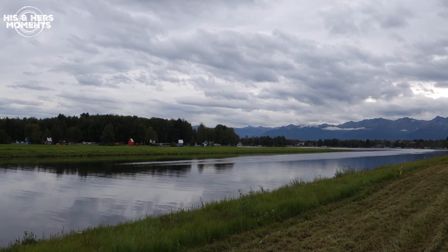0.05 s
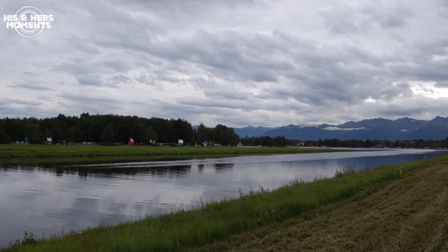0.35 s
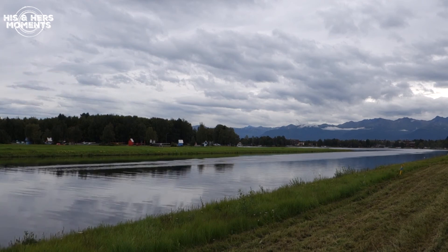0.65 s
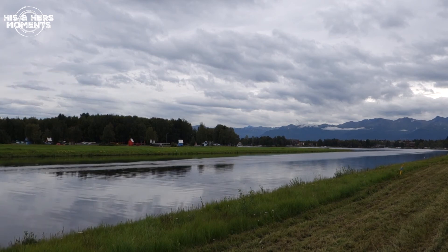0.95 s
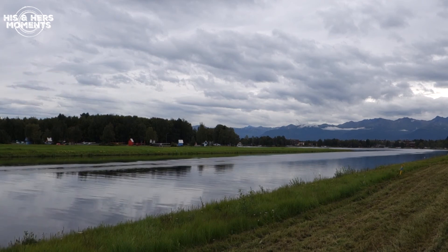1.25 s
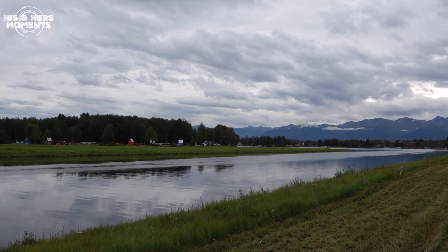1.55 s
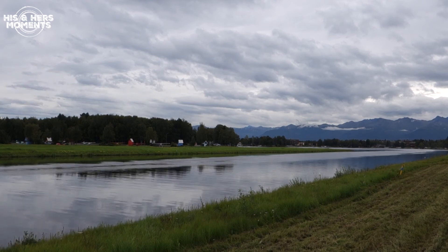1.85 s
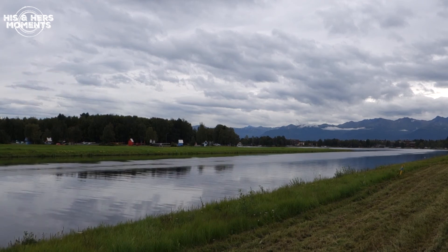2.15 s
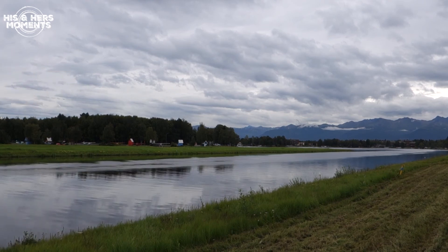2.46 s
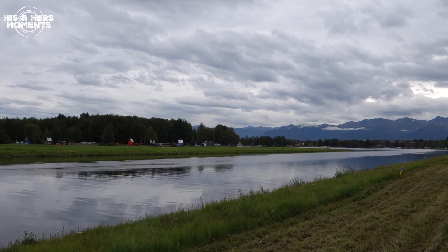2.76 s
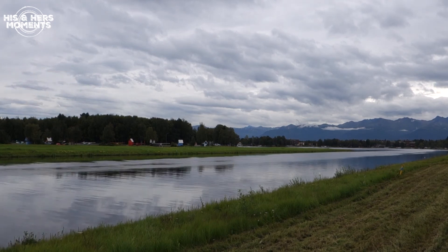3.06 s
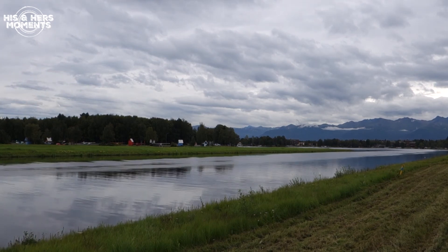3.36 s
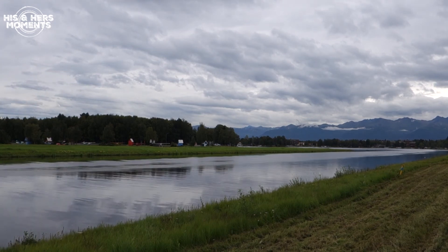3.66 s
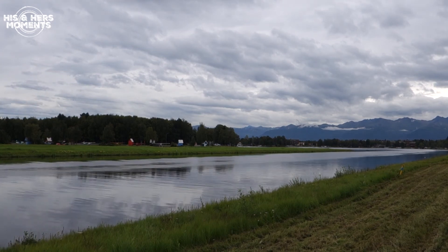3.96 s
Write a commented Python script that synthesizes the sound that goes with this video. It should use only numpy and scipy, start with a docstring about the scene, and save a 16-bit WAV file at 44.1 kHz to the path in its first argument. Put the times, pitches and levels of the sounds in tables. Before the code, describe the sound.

A small propeller aircraft passes, its buzz sinking into a duller, throbbing drone.

```python
"""Over soft ground, a piston engine, most likely a light propeller aircraft, passes and draws away.
The propeller's buzz sinks with the Doppler shift and gives way to the throb of uneven exhaust puffs.
Gas jets rasp and chopped air rushes above a low rumble. A reflection off the ground sweeps upward
through the rasp, and the air takes more and more of the treble."""
import sys
import numpy as np
from scipy import signal
from scipy.fft import rfft, irfft
from scipy.io import wavfile

SR = 44100
rng = np.random.default_rng(int(sys.argv[2]) if len(sys.argv) > 2 else 0)


def master_out(mix):
    """Clip the mix to full scale and print it as 16-bit PCM to the path in sys.argv[1]."""
    frames = np.transpose(np.atleast_2d(mix))
    ceiling = np.clip(frames, -1, 1)
    pcm = np.round(ceiling * 32767).astype(np.int16)
    wavfile.write(sys.argv[1], SR, pcm)


N = 176400
T = np.arange(N) / SR
BINS_HZ = np.maximum(np.arange(N // 2 + 1) * SR / N, 1)
CYLINDERS = 6

# firing rate as heard, falling with the Doppler shift: t/s, f/Hz
FIRING_RATE = [(0.0, 115.1), (0.4, 112.8), (0.8, 109.7), (1.2, 107.4), (1.6, 107), (2.0, 106.2),
               (2.5, 105.6), (3.0, 104.9), (3.5, 104.8), (4.0, 103.2)]


def from_db(db):
    """Decibels to gain."""
    return 10 ** (np.asarray(db) / 20)


def rms_one(x):
    """Scale to unit power."""
    return x / np.sqrt(np.mean(x ** 2) + 1e-20)


def in_time(rows):
    """An automation curve at every sample."""
    return np.interp(T, *np.transpose(rows))


def at_hz(points):
    """An EQ curve at every frequency bin."""
    hz, value = np.transpose(points)
    return np.interp(np.log(BINS_HZ), np.log(hz), value)


def colour(x, eq):
    """Shape a sound with an EQ curve; unit power."""
    return rms_one(irfft(rfft(x) * from_db(at_hz(eq)), N))


def drift(rate_hz):
    """Smooth random modulation of unit power."""
    hop, run_in = 100, 1000
    pole = np.exp(-2 * np.pi * rate_hz * hop / SR)
    noise = rng.standard_normal(N // hop + run_in + 2)
    slow = signal.lfilter([1], [1, -2 * pole, pole * pole], noise)[run_in:]
    return np.interp(np.arange(N) / hop, np.arange(len(slow)), rms_one(slow))


def partial(turns, db, waver_db, phase=0, waver_hz=3):
    """A sine of the given rms level that wavers in the moving air."""
    wander = np.log(from_db(waver_db)) * drift(waver_hz)
    gain = np.sqrt(2) * from_db(db + waver_db * drift(waver_hz))
    return gain * np.cos(2 * np.pi * turns + phase + wander)


def pulsing(cycle, per_firing=.08, per_rev=.096):
    """Gas flow swells with every firing and every revolution."""
    angle = 2 * np.pi * (cycle - .285)
    return rms_one(np.exp(per_firing * np.cos(CYLINDERS * angle) + per_rev * np.cos(2 * angle)))


def over_ground(x, strength, flip_hz=158, dull_hz=2510):
    """Add a late, dull reflection; soft ground inverts all but its bass."""
    # the reflection's lag shrinks, sweeping the comb upward: t/s, lag/ms
    lag = [(0, 2.1), (.4, 2.26), (.8, 2.3), (1.2, 2.18), (1.7, 2.02), (2.2, 1.63), (2.7, 1.51), (3.2, 1.4),
           (3.7, 1.19), (4, 1.16)]
    allpass = signal.bilinear([-1, 2 * np.pi * flip_hz], [1, 2 * np.pi * flip_hz], SR)
    flipped = signal.lfilter(*allpass, x)
    bounce = irfft(rfft(flipped) / (1 + (BINS_HZ / dull_hz) ** 4), N)
    return x + strength * np.interp(T - in_time(lag) / 1000, T, bounce)


def through_air(x):
    """The air absorbs more treble as the distance grows."""
    # absorption at 10 kHz: t/s, loss/dB
    absorption = [(0, 1.5), (.8, 2.5), (1.6, 7), (2.4, 9.5), (3.2, 14), (4, 23.5)]
    spectrum, loss_db, out = rfft(x), in_time(absorption), 0
    centres_hz = np.arange(0, 18001, 2000)
    for hz, weights in zip(centres_hz, np.eye(len(centres_hz))):
        band = irfft(spectrum * np.interp(BINS_HZ, centres_hz, weights), N)
        out = out + band * from_db(-loss_db * (hz / 10000) ** .86)
    return out


def pan_left(x):
    """The sound reaches the left side earlier and louder, then drifts towards the middle."""
    # delay of the right side: t/s, lag/microseconds
    lag = [(0, 52.3), (.5, 72.4), (1, 83), (1.5, 85.5), (2.2, 79.6), (3, 75), (4, 69.7)]
    # full lean to the left: f/Hz, left minus right/dB
    lean = [(40, 13), (110, 1.5), (200, 2.5), (380, 5.5), (700, 7), (1300, 10), (2400, 8), (4400, 2.5),
            (8000, 0), (12000, 0.5), (15000, 1)]
    # amount of that lean: t/s, share
    lean_share = [(0, 0.7), (1, 1), (2.4, 0.86), (3.2, 0.6), (4, 0.3)]
    spectrum, lean_db, share = rfft(x), at_hz(lean), in_time(lean_share)
    leaning = [irfft(spectrum * from_db(side * lean_db / 2), N) for side in (1, -1)]
    left, right = (x + share * (side - x) for side in leaning)
    oversampled = signal.resample(right, 4 * N)
    late_right = np.interp(T - in_time(lag) * 1e-6, np.arange(4 * N) / (4 * SR), oversampled)
    return np.array([left, late_right])


def rumble():
    """A bed of low outdoor noise that slowly builds."""
    # rumble EQ: f/Hz, level/dB
    eq = [(15, -40), (35, -16), (60, -5), (90, 1.5), (120, 9.5), (150, -8), (200, -5.5), (350, -2),
          (700, -17), (2000, -25.5)]
    # rumble fader: t/s, level/dB
    fader = [(0, -45.5), (2, -33.5), (3, -32.5), (4, -24.5)]
    return from_db(in_time(fader)) * colour(rng.standard_normal(N), eq)


def propeller_rush(cycle):
    """Air chopped by the propeller; returns the direct sound and a diffuse stereo wash."""
    # rush EQ: f/Hz, level/dB
    eq = [(60, -40), (600, -44), (1200, -6.5), (1900, -0.5), (2400, -1), (3100, 0.5), (4000, -2.5),
          (5000, -4.5), (6500, -4.5), (8000, -7.5), (10000, -9), (12500, -15.5), (15500, -48)]
    # rush fader: t/s, level/dB
    fader = [(0, -31.5), (.45, -32), (.85, -28), (1.2, -28), (2, -29), (2.8, -29), (3.4, -28.5), (4, -27)]
    gain = from_db(in_time(fader))
    chopped = rng.standard_normal(N) * pulsing(cycle, per_firing=.16, per_rev=.13)
    return gain * colour(chopped, eq), gain * colour(rng.standard_normal((2, N)), eq)


def jet_rasp(cycle, looped_share=.55):
    """Gas jets, partly alike in every cycle; returns the direct sound and a diffuse stereo wash."""
    # rasp EQ: f/Hz, level/dB
    eq = [(40, -17), (150, -4.5), (250, -1), (430, 0.5), (560, -1), (740, -3.5), (1000, -8), (1400, -10),
          (1900, -15.5), (2400, -31.5), (3200, -20.5), (5000, -36)]
    # rasp fader: t/s, level/dB
    fader = [(0, -22.5), (.5, -25.5), (.85, -19), (1.05, -22), (1.3, -24.5), (1.8, -26), (2.4, -28),
             (3.1, -29.5), (4, -27)]
    gain = from_db(in_time(fader))
    loop = rng.standard_normal(2048)
    looped = rms_one(np.interp(cycle, np.arange(len(loop)) / len(loop), loop, period=1))
    jets = np.sqrt(looped_share) * looped + np.sqrt(1 - looped_share) * rng.standard_normal(N)
    return gain * colour(jets * pulsing(cycle), eq), gain * colour(rng.standard_normal((2, N)), eq)


def rasp_swells(cycle, width_share=.055):
    """Narrow bands of the rasp rise and fade as they glide upward, pulsing with the engine."""
    # gliding noise bands: start/s, end/s, from/Hz, to/Hz, peak level/dB
    glides = [(0.306, 0.952, 1011, 1045, -31), (0.251, 0.748, 2910, 3080, -38),
              (0.593, 1.257, 1862, 2052, -35.5), (0.698, 2.05, 657.7, 816, -27),
              (0.895, 1.555, 423.8, 442, -26.5), (1.099, 1.701, 3600, 3870, -34.5),
              (1.498, 2.105, 2600, 2850, -38.5), (1.649, 2.554, 878, 997, -32.5),
              (1.996, 3.5, 960.8, 975, -42), (2.6, 3.399, 1223, 1293, -36.5),
              (2.993, 3.807, 1820, 2015, -35.5)]
    out = 0
    for start, end, from_hz, to_hz, db in glides:
        progress = np.clip((T - start) / (end - start), 0, 1)
        angle = 2 * np.pi * np.cumsum(from_hz + (to_hz - from_hz) * progress) / SR
        lowpass = signal.butter(2, width_share * from_hz, fs=SR, output="sos")
        in_phase, quadrature = signal.sosfilt(lowpass, rng.standard_normal((2, N)))
        band = rms_one(in_phase * np.cos(angle) + quadrature * np.sin(angle))
        out = out + from_db(db) * np.sin(np.pi * progress) * band
    return out * pulsing(cycle)


def drone(cycle):
    """Clean tones of engine and propeller, with a buzz on top that fades as the aircraft turns away."""
    # faders of the tones at 1, 1.5, 2, 3 and 4 times the firing rate: t/s, level/dB
    root = [(0, -33), (.5, -20), (1.3, -17.5), (2.2, -21), (2.9, -24), (3.498, -28.5), (4, -32)]
    fifth = [(0.0, -47), (0.14, -34.5), (1.41, -37), (2.09, -29.5), (3.24, -24), (4.0, -22.5)]
    octave = [(0.0, -37), (0.03, -21.5), (0.19, -18), (0.85, -14), (1.92, -41.5), (2.94, -36.5),
              (3.21, -53), (4.0, -41)]
    twelfth = [(0, -19.5), (.6, -20.5), (1.15, -21), (1.6, -31), (1.9, -29), (2.2, -30), (2.6, -46),
               (4, -33.5)]
    double_octave = [(0, -24.5), (.45, -32), (.8, -29), (1.3, -25), (1.652, -64), (2.3, -69), (4, -91)]
    # the propeller's upper harmonics: multiple of the firing rate, level/dB
    harmonics = [(5, -1), (6, 0), (7, -11.5), (8, -14.5), (9, -15), (10, -16), (11, -16), (12, -16.5),
                 (13, -27), (14, -21)]
    # buzz fader: t/s, level/dB
    buzz_fader = [(0, -20), (.45, -25), (.85, -37), (1.3, -31), (1.8, -42), (2.6, -53.5), (4, -65)]
    firing = CYLINDERS * (cycle - .125)  # counted from the strongest puff
    voices = [(1, root, 1), (1.5, fifth, 1), (2, octave, 1), (3, twelfth, -1), (4, double_octave, -1)]
    tones = sum(polarity * partial(k * firing, in_time(fader), waver_db=.6)
                for k, fader, polarity in voices)
    buzz = sum(partial(k * firing, in_time(buzz_fader) + db, waver_db=1.04, phase=rng.uniform(0, 2 * np.pi))
               for k, db in harmonics)
    return tones + buzz


def exhaust(cycle, hump_db=6, hump_width_hz=40):
    """One strong puff and several weaker ones in each engine cycle make the pipe's partials throb."""
    # uneven puffs, which set the partials' phases: position/cycles, level/dB
    puffs = [(.125, 0), (.27, -16), (.45, -12.5), (.61, -8), (.85, -7.5)]
    # exhaust partials: multiple of the cycle rate, level/dB
    partials = [(3, -47), (4, -49.5), (5, -42), (7, -38), (8, -52), (11, -40), (13, -47), (14, -41),
                (15, -50), (16, -29), (17, -44), (18, -39), (19, -40), (20, -29), (21, -34), (22, -30),
                (23, -33), (24, -34.5), (25, -40), (26, -35.5), (27, -52), (28, -36), (29, -46),
                (30, -42.5), (32, -45), (36, -44)]
    # exhaust fader: t/s, level/dB
    fader = [(0, -22), (.7, -9.5), (1.3, -2), (2.1, 0.5), (2.7, -1), (3.2, -5.5), (4, -9.5)]
    # centre of a bell boost that moves with the angle of the pass: t/s, f/Hz
    hump = [(0, 363), (1, 280), (1.6, 270), (2.2, 353), (2.6, 389), (3.2, 401), (4, 380)]
    # how far the partials are out of step: t/s, phase spread/rad
    smear = [(0, 2.5), (1.1, 1.2), (1.6, 0.5), (2.1, 0.2), (2.8, 0.25), (3.3, .55), (4, 0.85)]
    level_db, cycle_hz, hump_hz = in_time(fader), in_time(FIRING_RATE) / CYLINDERS, in_time(hump)
    puff_at, puff_db = np.transpose(puffs)
    out = 0
    for order, db in partials:
        lift_db = hump_db * np.exp(-.5 * ((order * cycle_hz - hump_hz) / hump_width_hz) ** 2)
        puff_phase = np.angle(np.sum(from_db(puff_db) * np.exp(-2j * np.pi * order * puff_at)))
        phase = puff_phase + in_time(smear) * rng.normal()
        out = out + partial(order * cycle, level_db + db + lift_db, waver_db=.8, phase=phase)
    return -out


def scene():
    """The engine over ground and through air, above a low rumble."""
    cycle = np.cumsum(in_time(FIRING_RATE)) / CYLINDERS / SR  # one cycle is two revolutions
    rasp, rasp_wash = jet_rasp(cycle)
    rush, rush_wash = propeller_rush(cycle)
    fluttering = (rasp + rush) * from_db(drift(rate_hz=21))  # 1 dB rms of flutter
    engine = drone(cycle) + rasp_swells(cycle)
    engine += over_ground(exhaust(cycle), strength=.12) + over_ground(fluttering, strength=.5)
    scattered = from_db(-7.5) * rasp_wash + from_db(-25) * rush_wash  # back from the banks and trees
    return through_air(pan_left(engine + rumble()) + scattered)


def record(dry, fade_s=.004, cutoff_hz=15200):
    """The ends are eased, the top is cut steeply and rare peaks are rounded."""
    eased = dry * np.clip(np.minimum(T, T[-1] - T) / fade_s, 0, 1)
    cut = signal.sosfilt(signal.ellip(10, .1, 90, cutoff_hz, fs=SR, output="sos"), eased)
    return cut / (1 + cut ** 8) ** (1 / 8)


dry = scene()
out = record(dry)
master_out(out)
```